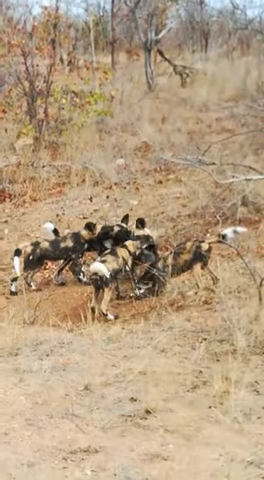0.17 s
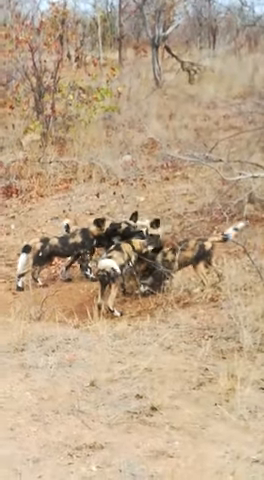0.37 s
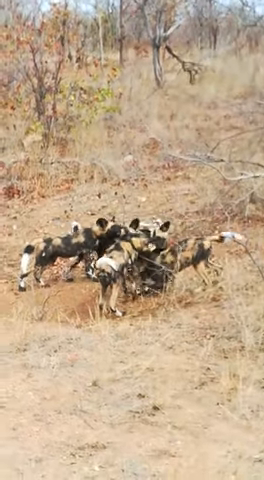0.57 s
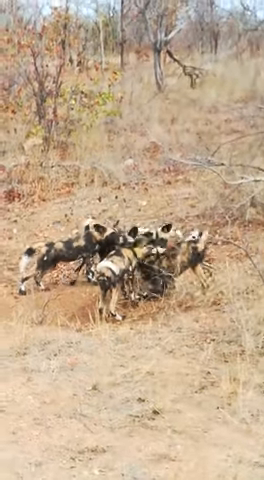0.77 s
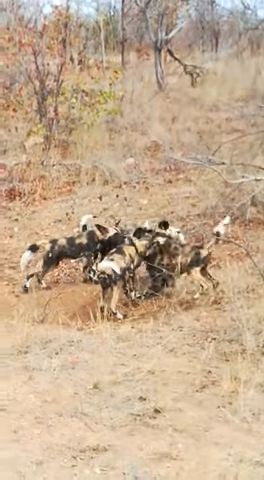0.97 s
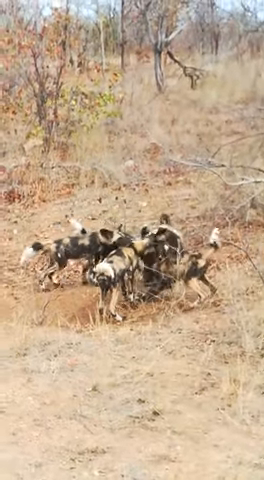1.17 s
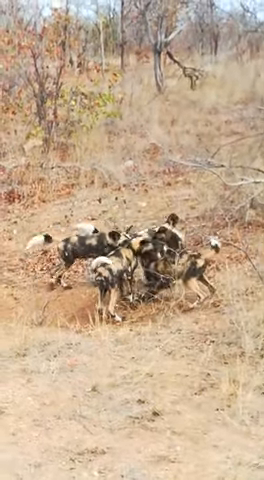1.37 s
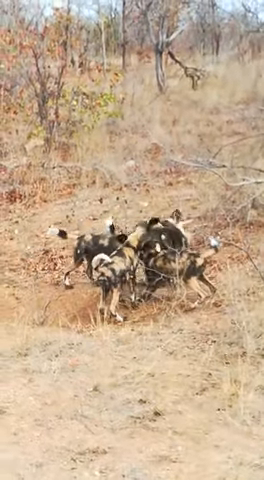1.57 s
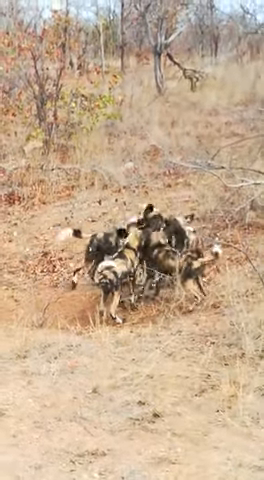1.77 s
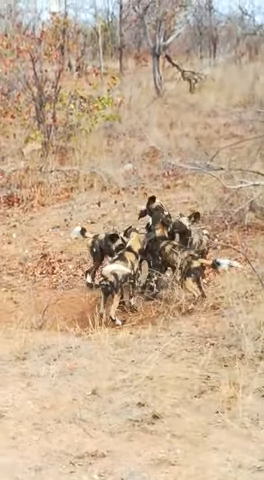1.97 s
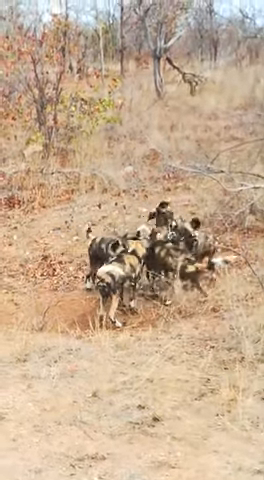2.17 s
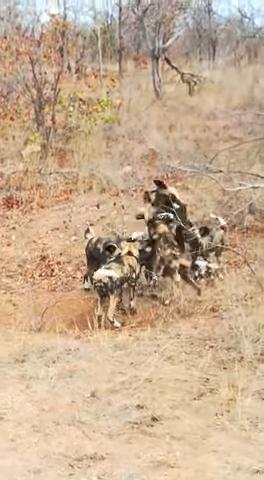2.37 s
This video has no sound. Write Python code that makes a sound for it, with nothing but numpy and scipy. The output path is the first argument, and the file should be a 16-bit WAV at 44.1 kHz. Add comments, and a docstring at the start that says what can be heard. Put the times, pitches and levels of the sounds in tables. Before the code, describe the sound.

African wild dogs twitter in quick, high, bird-like chirps while low wind thumps the microphone outdoors

```python
"""Dry ground with brush, some metres from the microphone: a pack of wild dogs crowds together.
Their gliding whistles are breathy tones, some with a low whine under them, a stack of harmonics.
Paws scuff in litter as grainy shaped noise with twig ticks. Wind buffets the microphone in low lumps
of noise and sharp pushes, over faint still air. The left channel hears everything slightly earlier
and mostly brighter."""
import sys
import numpy as np
from scipy import signal
from scipy.fft import rfft, irfft, next_fast_len
from scipy.io import wavfile
from scipy.ndimage import uniform_filter1d, map_coordinates

SR = 44100
rng = np.random.default_rng(int(sys.argv[2]) if len(sys.argv) > 2 else 0)


def boost_factor(decibels):
    """Convert a level in decibels to a linear amplitude factor."""
    exponent = np.asarray(decibels, float) / 20
    return 10 ** exponent


def generate_wav(signal):
    """Clip the signal to [-1, 1] and save it as 16-bit WAV at the path in sys.argv[1]."""
    frames = np.transpose(np.atleast_2d(signal))
    scaled = np.clip(frames, -1, 1) * 32767
    pcm = np.round(scaled).astype(np.int16)
    wavfile.write(sys.argv[1], SR, pcm)


N = 105840  # samples

# Whistle contours, one list per call: time_s, pitch_hz, level_db (before the common whistle gain)
WHISTLES = [
    [(0.04, 7050, -66), (0.062, 7078, -53.5), (0.078, 6560, -63), (0.086, 6470, -51.5), (0.1, 7530, -42.5),
     (0.107, 7510, -63)],
    [(0.252, 6870, -50.5), (0.276, 7060, -48.5), (0.296, 6240, -51), (0.306, 5720, -71.5),
     (0.332, 7030, -44.5), (0.338, 7700, -83)],
    [(0.513, 7760, -80), (0.546, 7520, -59), (0.58, 6197, -51), (0.604, 5550, -67.5), (0.626, 6746, -61.5)],
    [(1.068, 11623, -77), (1.086, 10990, -68), (1.128, 11750, -82), (1.15, 11800, -92), (1.188, 12150, -84),
     (1.218, 10600, -91), (1.246, 12040, -79), (1.266, 8620, -81), (1.278, 6190, -58.5),
     (1.29, 6380, -60.5), (1.305, 6440, -68)],
    [(1.535, 9130, -77), (1.549, 7950, -57.5), (1.561, 7250, -49.5), (1.583, 6170, -59), (1.596, 6680, -58)],
    [(1.69, 7969, -72.5), (1.728, 7680, -69), (1.742, 6925, -52.5), (1.752, 8221, -58), (1.762, 8800, -62)],
    [(1.808, 8700, -58), (1.824, 7730, -51), (1.85, 6960, -51), (1.86, 6900, -46), (1.872, 6270, -43),
     (1.892, 6560, -74)],
    [(1.982, 6800, -73), (1.996, 7680, -81.5), (2.034, 7330, -56), (2.046, 7017, -56.5), (2.06, 6420, -52),
     (2.075, 6860, -68)],
    [(2.128, 8100, -68.5), (2.14, 7091, -54), (2.146, 6970, -45.5), (2.178, 6420, -51.5),
     (2.188, 6340, -45.5), (2.2, 6700, -94)],
    [(2.278, 7770, -66), (2.286, 7400, -56), (2.334, 6470, -58), (2.36, 6340, -53), (2.384, 6290, -42.5),
     (2.399, 6300, -75)],
    [(0.183, 7940, -73), (0.209, 8340, -57.5), (0.247, 8340, -54), (0.287, 8790, -46), (0.319, 8450, -55.5),
     (0.333, 7800, -65), (0.351, 7430, -57.5), (0.371, 5995, -47.5), (0.393, 7060, -51.5)],
    [(0.64, 8900, -73), (0.652, 9120, -58), (0.67, 9040, -72), (0.706, 11580, -74), (0.76, 9800, -78.5),
     (0.806, 5930, -49.5), (0.828, 7190, -53), (0.842, 6539, -60.5), (0.855, 5800, -69)],
    [(1.02, 14078, -95), (1.038, 14961, -69), (1.056, 13416, -83)],
    [(1.125, 7800, -67.5), (1.153, 7340, -60), (1.206, 6090, -61)],
    [(1.436, 7600, -76.5), (1.442, 8550, -62), (1.448, 9400, -73)],
    [(2.054, 8118, -67), (2.07, 8120, -61), (2.082, 8900, -76)],
    [(2.318, 7000, -47.5), (2.322, 7000, -61), (2.352, 7430, -60)],
]
# Whine contours, one list per call: time_s, pitch_hz, level_db (before the common whine gain)
WHINES = [
    [(0.352, 508.6, -76.5), (0.39, 418, -81.5), (0.42, 348, -81.5)],
    [(0.765, 1037, -79), (0.78, 993, -83), (0.793, 910, -78)],
    [(1.478, 1005, -77.5), (1.494, 1050, -71), (1.506, 996, -81)],
    [(1.51, 1284, -81.5), (1.532, 1280, -95), (1.56, 997, -87)],
    [(1.786, 924, -78.5), (1.83, 982, -81), (1.848, 970, -96), (1.862, 860, -77)],
    [(2.101, 872, -74), (2.115, 881, -62.5), (2.138, 931, -66.5), (2.167, 788, -65), (2.178, 807, -88)],
    [(2.31, 730, -76.5), (2.346, 575.5, -66.5), (2.36, 499, -78.5), (2.378, 490, -76)],
]
# Whine tone, one row per whine: overtone_db (before throat and mouth), sum_tone_db (line above a high whistle),
# mouth_start_hz, mouth_end_hz
WHINE_TONE = [(-21, -47, 2500, 1500), (-7, -28, 2100, 2000), (3, -40, 2100, 2000), (-4.5, -41, 2600, 1800),
              (3.5, -11, 4050, 1300), (-5, -1.5, 3070, 4370), (-9.5, -47, 2440, 3100)]
# Throat response for whine overtones: frequency_hz, gain_db
THROAT = [(1300, -8), (2000, -12), (4400, -15.5), (5300, -7), (6200, -3.5), (7500, -14)]
# Echo decay off ground and brush: frequency_hz, t60_s
ECHO_DECAY = [(1500, 0.065), (7000, 0.075)]
# The pack as the right channel hears it: frequency_hz, gain_db
RIGHT_RESPONSE = [(600, -13), (1200, 1.5), (2500, -3), (5000, -1), (7000, -20), (12000, -13)]
# Paw scuffing: time_s, level_db (before the scuff gain)
SCUFF_LEVEL = [(0.03, -85), (0.94, -79.5), (1.02, -78), (1.08, -61.5), (1.11, -71.5), (1.2, -77),
               (1.49, -83.5), (1.8, -78.5), (2.03, -88.5), (2.075, -66), (2.1, -75), (2.27, -86),
               (2.31, -73.5), (2.4, -74.5)]
# Spectrum of disturbed litter: frequency_hz, relative_level_db
SCUFF_SPECTRUM = [(600, -5), (1200, -7.5), (4500, -3.5), (7000, 4), (9000, -2.5), (11000, -17.5),
                  (15500, -23.5)]
# Twigs underfoot: start_s, level_db (before the tick gain)
TWIG_TICKS = [(0.889, -58.5), (1.0407, -53.5), (1.549, -60), (1.8827, -61)]
# Wind strength: time_s, strength_db (before the band gains)
WIND_STRENGTH = [(0.02, -42.5), (0.23, -43.5), (0.26, -29.5), (0.48, -53.5), (0.52, -36.5), (0.63, -33),
                 (0.78, -42.5), (0.79, -46.5), (0.93, -32.5), (0.97, -47.5), (1.2, -38.5), (1.22, -33.5),
                 (1.31, -39.5), (1.39, -30.5), (1.46, -56.5), (1.62, -44.5), (1.64, -39.5), (1.72, -57.5),
                 (1.92, -51.5), (1.96, -79), (1.99, -48.5), (2.12, -34), (2.19, -61.5), (2.4, -71)]
# Spectrum of wind rumble before its split in two bands: frequency_hz, relative_level_db
WIND_SPECTRUM = [(12, -30), (20, -4), (70, 1), (118, -3.5), (209, -12.5), (471, -30.5), (780, -78.5),
                 (1320, -120)]
# Sharp gust pushes: time_s (centre follows 9 ms later), envelope_peak_db
GUST_PUSHES = [(0.25, -17.5), (0.565, -23), (0.638, -19.5), (0.687, -26), (0.757, -28.5), (0.83, -30),
               (0.905, -23), (1.212, -24.5), (1.337, -35), (1.376, -29), (1.997, -32), (2.073, -31.5)]
# Spectrum of still air: frequency_hz, relative_level_db
AIR_SPECTRUM = [(180, -5), (633, -11), (1400, -9.5), (15800, -21)]


def along(points, hz):
    """Frequency response: interpolates (Hz, value) points on a logarithmic axis."""
    f, value = np.transpose(points)
    return np.interp(np.log(hz + 1), np.log(f + 1), value)


def curves(rows):
    """Control contours: linear interpolation gives one value per sample for each column after the time."""
    time_s, *columns = np.transpose(rows)
    return [np.interp(np.arange(N) / SR, time_s, column) for column in columns]


def unit(x):
    """Normalisation of power: scales to rms 1."""
    return x / np.sqrt(np.mean(x ** 2) + 1e-20)


def wobble(knots_per_s):
    """Band-limited random fluctuation: a smooth spline through random knots."""
    knots = rng.standard_normal(int(N * knots_per_s / SR) + 4)
    return map_coordinates(knots, [np.arange(N) * knots_per_s / SR])


def filtered(x, response):
    """Linear filtering: multiplies the spectrum by a complex response of frequency."""
    size = next_fast_len(N + SR // 2)
    spectrum = rfft(x, size) * response(np.fft.rfftfreq(size, 1 / SR))
    return irfft(spectrum, size)[..., :N]


def coloured(x, spectrum):
    """Spectral shaping: gives x a (Hz, dB) spectrum, then rms 1."""
    return unit(filtered(x, lambda hz: boost_factor(along(spectrum, hz))))


def pair(alike):
    """Interchannel correlation: two noises with a shared part, correlated by alike."""
    a, b = rng.standard_normal((2, N))
    share = np.clip(alike, 0, 1)
    return np.array([a, share * a + np.sqrt(1 - share ** 2) * b])


def voice(rows, jitter):
    """Phase as the integral of pitch: returns pitch, phase, amplitude and gate of one call."""
    edge_s = 0.003  # onset and release, just outside the contour
    glide_s = 0.0064  # how slowly the throat turns its pitch
    hz, db = curves(rows)
    t = np.arange(N) / SR
    nearest_end_s = np.minimum(t - rows[0][0], rows[-1][0] - t)
    gate = np.clip(nearest_end_s / edge_s + 1, 0, 1) ** 2
    hz = uniform_filter1d(hz, round(glide_s * SR)) * (1 + jitter)
    phase = 2 * np.pi * np.cumsum(hz) / SR
    return hz, phase, np.sqrt(2) * boost_factor(db) * gate, gate


def whistles(coupling):
    """Modulation of a carrier: breath roughens each whistle, a whine adds a sum tone above a high one."""
    total = np.zeros(N)
    quiver = 0.0021 * wobble(300)  # fraction of pitch
    shimmer = boost_factor(3.15 * wobble(150))
    breath = boost_factor(-17) * (wobble(900) + 1j * wobble(900))
    for rows in WHISTLES:
        hz, phase, size, _ = voice(rows, quiver)
        rasp = breath * np.clip((8600 - hz) / 1500, 0.2, 1)  # stronger on low notes
        sum_tone = coupling * np.clip((hz - 6600) / 700, 0, 1)
        total += size * ((1 + rasp + sum_tone) * np.exp(1j * phase)).real
    return boost_factor(8.5) * total * shimmer


def whines():
    """Harmonic series through a moving resonance: returns the whines and their coupling to whistles."""
    mouth_db, mouth_width_hz = 16, 510  # lift and width of the mouth resonance
    closing_db = -18  # overtone change by the end of a whine
    total, coupling = np.zeros(N), np.zeros(N, complex)
    drift = 0.00335 * wobble(120)  # fraction of pitch
    flutter = boost_factor(1.2 * wobble(60))
    for rows, (overtone_db, sum_tone_db, from_hz, to_hz) in zip(WHINES, WHINE_TONE):
        hz, phase, size, gate = voice(rows, drift)
        progress = np.interp(np.arange(N) / SR, [rows[0][0], rows[-1][0]], [0, 1])
        mouth_hz = from_hz + (to_hz - from_hz) * progress
        tone = np.sin(phase)
        for k in range(2, 9):
            mouth = mouth_db * np.exp(-((k * hz - mouth_hz) / mouth_width_hz) ** 2)
            lift_db = along(THROAT, k * hz) + mouth + closing_db * progress ** 2
            tone += boost_factor(overtone_db + lift_db) * np.sin(k * phase)
        total += size * tone
        coupling += boost_factor(sum_tone_db) * gate * np.exp(1j * phase)
    return boost_factor(14) * total * flutter, coupling


def scrub_echo(x):
    """Diffuse reflection: convolves with a short decaying noise, different in each channel."""
    hz, t, z = signal.stft(rng.standard_normal((2, SR // 4)), SR, nperseg=128)
    decay = boost_factor(-60 * t / along(ECHO_DECAY, hz)[:, None])
    tail = signal.istft(z * decay, SR, nperseg=128)[1]
    tail = tail / np.linalg.norm(tail[0])
    late = np.pad(x, (130, 0))  # samples before the echo begins
    return signal.fftconvolve(late[None], tail, axes=1)[:, :N]


def scuffle():
    """Granular friction noise: paws make grainy hiss in dry litter, and twigs tick with sharp decays."""
    db, = curves(SCUFF_LEVEL)
    crackle = (rng.random(N) < 400 / SR) * boost_factor(0.44 * rng.exponential(size=N))  # mean 400 grains/s
    grains = 1 + 0.34 * unit(uniform_filter1d(crackle, size=60))
    hiss = coloured(pair(alike=0.023) * grains, SCUFF_SPECTRUM)
    t = np.arange(N) / SR
    ticks = np.zeros(N)
    for start_s, level_db in TWIG_TICKS:
        ticks += boost_factor(level_db + 5) * (t > start_s) * np.exp(-np.abs(t - start_s) / 0.0024)
    snaps = ticks * coloured(pair(alike=0.21), SCUFF_SPECTRUM)
    return boost_factor(db + 15.5 + 2.6 * wobble(59.83)) * hiss + snaps


def wind_rumble():
    """Turbulent pressure noise: a lumpy rumble, brighter as it swells."""
    db, = curves(WIND_STRENGTH)
    # two bands that cross at 150 Hz
    deep = filtered(coloured(pair(alike=1.0), WIND_SPECTRUM), lambda hz: 1 / (1 + (hz / 150) ** 2))
    sharp = filtered(coloured(pair(alike=1.0), WIND_SPECTRUM),
                     lambda hz: 1 / (1 + (150 / (hz + 1)) ** 2))
    swell_db = db - db.max()
    sharp_db = 3.0 + 0.61 * swell_db + 7.2 * wobble(40.49)
    return boost_factor(db + 1.6 * wobble(29.81)) * (boost_factor(3.5) * deep + boost_factor(sharp_db) * sharp)


def wind_pushes():
    """Pressure transients: each sharp push is a sine pulse in a Gaussian envelope."""
    pushes = np.zeros(N + SR)
    t = np.arange(SR // 20) / SR
    u = t - t.mean()
    for time_s, peak_db in GUST_PUSHES:
        hz = 115 * boost_factor(1.75 * rng.standard_normal())
        pulse = np.sin(2 * np.pi * hz * u) * np.exp(-(u / 0.0042) ** 2)
        first = round((time_s + 0.009 - t.mean()) * SR)
        pushes[first:][:len(t)] += boost_factor(peak_db) * pulse
    return pushes[:N]


def still_air():
    """Stationary background noise: a faint steady hiss, nearly independent in the two channels."""
    return boost_factor(-68.5) * coloured(pair(alike=0.13), AIR_SPECTRUM)


def scene():
    """Superposition and interchannel delay: pack, litter, wind and air add, the right channel late."""
    low, coupling = whines()
    high = whistles(coupling)
    echo = scrub_echo(high + 0.4 * low)  # low notes scatter less
    pack = low + high + boost_factor(-4.0) * echo * boost_factor([[0], [4]]) + scuffle()
    pack[1] = filtered(pack[1], lambda hz: boost_factor(along(RIGHT_RESPONSE, hz)))
    gusts = wind_rumble() + wind_pushes()
    gusts[1] = filtered(gusts[1], lambda hz: 1 / (1 + 1j * hz / 450))  # duller on the right
    mix = pack + gusts + still_air()
    delay_s = np.array([[0], [0.000781]])  # left, right
    return filtered(mix, lambda hz: np.exp(-2j * np.pi * hz * delay_s))


def band_limit(x):
    """A steep low-pass at the top of the band."""
    return signal.sosfilt(signal.butter(12, 15990, fs=SR, output="sos"), x)


def record(dry):
    """Identity of level: the finished mix passes on without added gain."""
    return band_limit(dry)


dry = scene()
out = record(dry)
generate_wav(out)
```